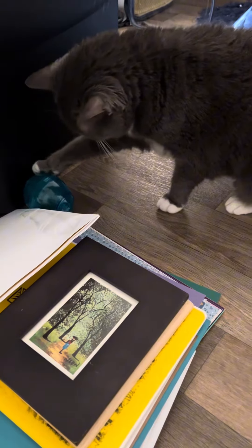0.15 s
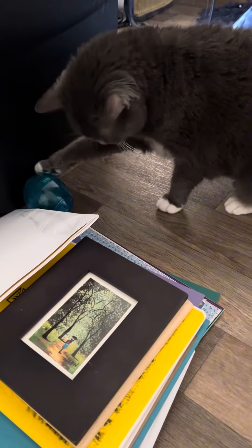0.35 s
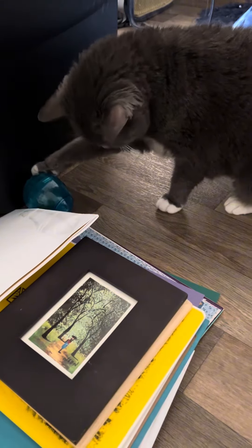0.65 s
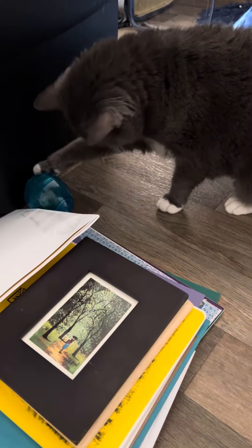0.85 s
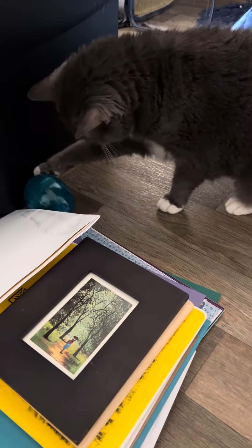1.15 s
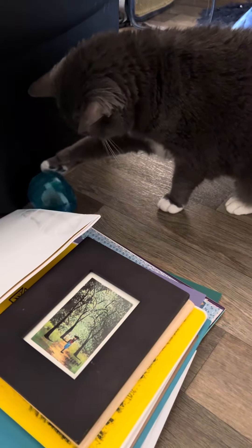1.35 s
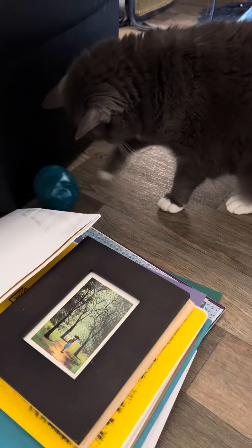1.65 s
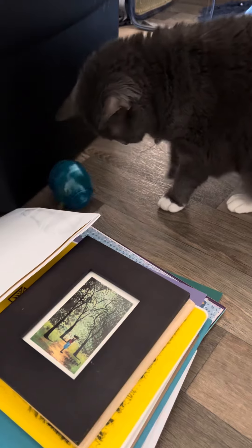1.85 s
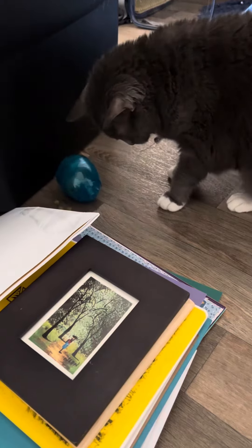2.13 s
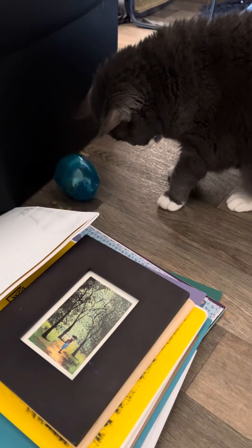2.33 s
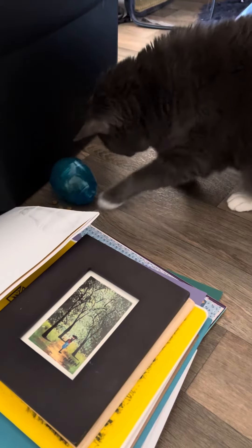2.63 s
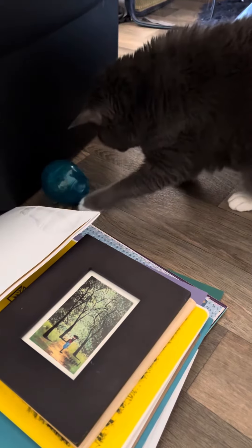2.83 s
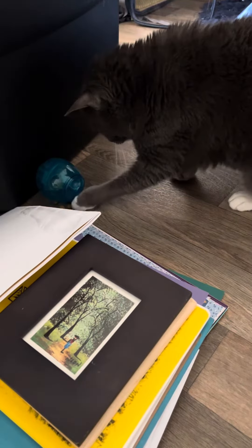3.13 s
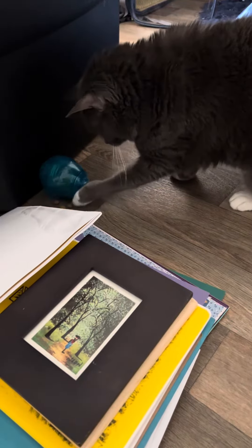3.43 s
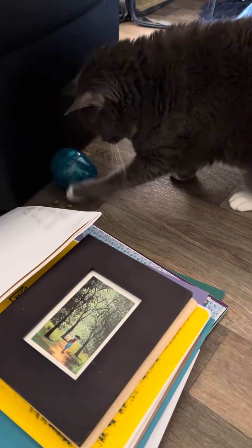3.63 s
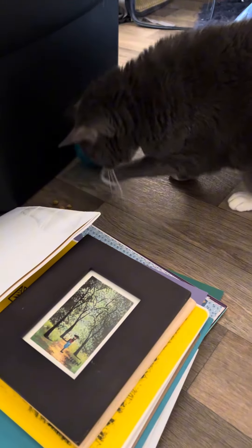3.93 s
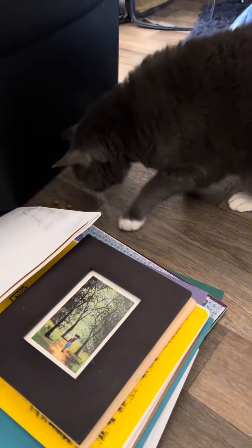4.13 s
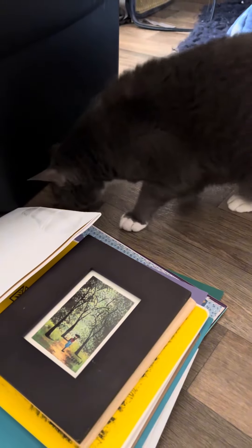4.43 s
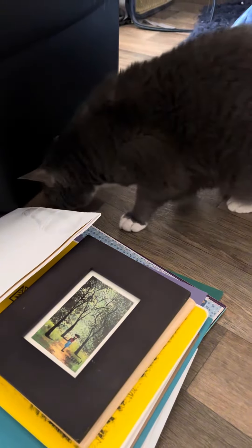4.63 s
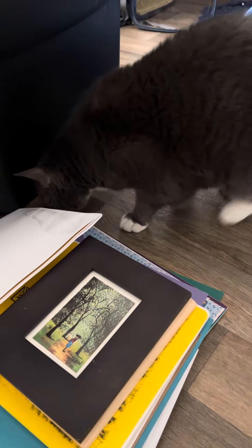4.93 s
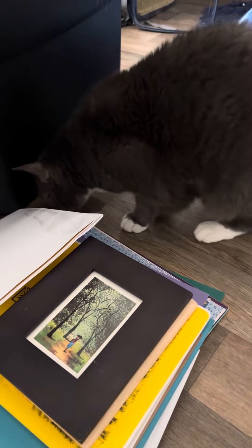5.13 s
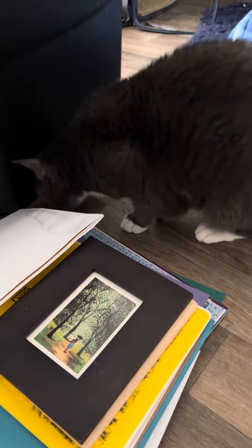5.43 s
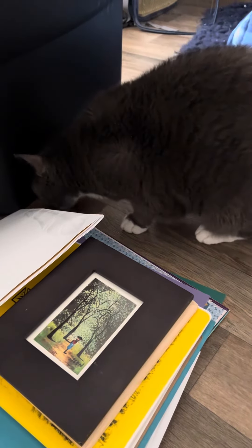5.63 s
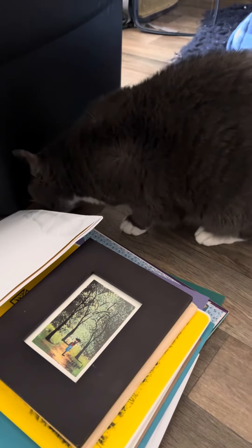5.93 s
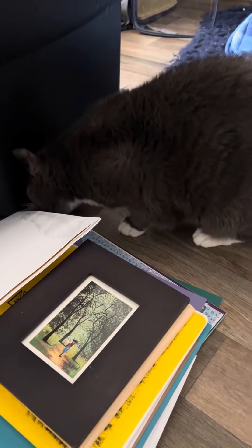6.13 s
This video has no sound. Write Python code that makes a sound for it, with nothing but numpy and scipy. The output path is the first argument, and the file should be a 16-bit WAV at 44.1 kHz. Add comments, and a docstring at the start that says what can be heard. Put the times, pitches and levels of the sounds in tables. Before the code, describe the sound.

A cat bats a hollow plastic treat ball on a hard floor indoors, close to the microphone. Two separate hits make the shell clack and the treats inside rattle. After a soft swish, the ball drops with dull thuds and rolls in a busy run of clacks. Then only faint ticks and bumps remain. Appliances hum low throughout, at first with a light hiss.

```python
"""A cat bats a hollow plastic treat ball over a hard floor, close to a two-port microphone.
Appliances hum throughout, at first under a broad hiss. At 1 s and 1.5 s the ball is struck: its shell
clacks and rings briefly, loose treats rattle, and a drop thuds through the floor boards. Near 2.7 s comes
a soft swish as the hiss fades. From 3 s the ball drops, clacks and rolls in a busy run.
After about 4.5 s only faint ticks, bumps and brief wisps of very high hiss are left over the hum."""
import sys
import numpy as np
from scipy import signal
from scipy.fft import rfft, irfft, next_fast_len
from scipy.io import wavfile
from scipy.ndimage import uniform_filter1d, map_coordinates

SR = 44100
rng = np.random.default_rng(int(sys.argv[2]) if len(sys.argv) > 2 else 0)


def unload_audio(sound):
    """Save the sound as a 16-bit wav file, at the path given as the first command line argument."""
    columns = np.transpose(np.atleast_2d(sound))
    # keep every value between -1 and 1, then stretch to whole-number steps
    steps = np.round(np.clip(columns, -1, 1) * 32767)
    wavfile.write(sys.argv[1], SR, steps.astype(np.int16))


N = 276782
TOP_HZ = 16000

# the notes the plastic shell rings at: f/Hz, level/dB, t60/s (time to fade by 60 dB)
SHELL = [(1450, -3, .018), (1780, -5, .014), (2120, -1, .018), (2440, 0, .018), (3250, -3, .011),
         (3850, -3, .011), (4860, -1, .011), (5250, -2, .009)]


def amp(db):
    """Turns decibels into a gain."""
    return 10 ** (np.asarray(db) / 20)


def unit(x):
    """Scales x to an average (rms) size of 1."""
    return x / np.sqrt(np.mean(x ** 2) + 1e-20)


def along(points, hz, axis=1):
    """Reads a table column between its rows, on a log frequency scale."""
    table = np.transpose(points)
    return np.interp(np.log(hz + 1), np.log(table[0] + 1), table[axis])


def curves(rows):
    """One value per sample for each column after the time."""
    s, *cols = np.transpose(rows)
    return [np.interp(np.arange(N) / SR, s, c) for c in cols]


def wobble(rate):
    """A smooth curve through `rate` random points a second."""
    return map_coordinates(rng.standard_normal(int(N * rate / SR) + 4), [np.arange(N) * rate / SR])


def filtered(x, response):
    """Scales and delays each frequency of x as response says."""
    m = next_fast_len(N + SR // 2)
    return irfft(rfft(x, m) * response(np.fft.rfftfreq(m, 1 / SR)), m)[..., :N]


def coloured(x, spectrum):
    """Shapes x by a table of f/Hz, level/dB, at rms 1."""
    return unit(filtered(x, lambda hz: amp(along(spectrum, hz))))


def tilted(x, tilt_db):
    """Raises or lowers the treble above 6 kHz."""
    low = filtered(x, lambda hz: 1 / (1 + (hz / 6000) ** 4))
    return low + amp(tilt_db) * (x - low)


def patchy_noise(depth_db):
    """Two noises with louder and softer patches in time and pitch."""
    z = signal.stft(rng.standard_normal((2, N)), nperseg=512)[2]
    patches = uniform_filter1d(uniform_filter1d(rng.standard_normal(z.shape[1:]), 4, 0), 14, 1)
    return signal.istft(z * amp(depth_db * unit(patches)), nperseg=512)[1][:, :N]


def ring(notes, t, attack_s):
    """Fading notes, peak 1; each blow lands elsewhere, so strengths and pitches shift a little."""
    x = sum(amp(db + rng.normal(0, 3) - 60 * t / t60) * np.sin(2 * np.pi * hz * rng.normal(1, .025) * t)
            for hz, db, t60 in notes)
    x = x * (1 - np.exp(-t / attack_s)) ** 2
    return x / np.abs(x).max()


def hum():
    """Appliances make a low, throbbing rumble."""
    # loudness over time: t/s, level/dB
    levels = [(0.0, -56.5), (0.38, -59.5), (0.99, -53.5), (1.35, -57), (1.71, -54), (2.25, -62.5),
              (2.57, -56), (2.95, -61.5), (3.62, -58.5), (3.76, -67), (3.91, -52), (5.02, -62),
              (5.44, -59.5), (6.28, -63)]
    # tone colour: f/Hz, level/dB
    rumble = [(25, -34.5), (40, -16), (57, 1), (80, -8), (100, -10.5), (115, 3.5), (135, -15), (200, -18.5),
              (300, -33.5), (450, -59)]
    hum_db, = curves(levels)
    return amp(hum_db + 1.8 * wobble(4)) * coloured(rng.standard_normal((2, N)), rumble)


def fan():
    """A fan whirs, with faint tones that waver together in pitch."""
    # colour of the whir: f/Hz, level/dB
    colour = [(150, -10.5), (350, -9), (680, -10), (775, -2), (840, -7.5), (920, 3), (1040, -8.5),
              (1470, -13.5), (2000, -22), (2600, -14.5), (3200, -27), (8000, -39.5), (13000, -45.5),
              (14500, -53.5)]
    # the fan's tones: f/Hz, level/dB
    notes = [(908, -72.5), (1470, -80.5), (778, -75.5), (2700, -91.5)]
    whir = amp(-68.5 + 0.84 * wobble(3.98)) * coloured(patchy_noise(depth_db=1.5), colour)
    clock = np.cumsum(1 + 0.0027 * wobble(6)) / SR
    tones = sum(amp(db + 0.72 * wobble(15)) * np.sin(2 * np.pi * hz * clock) for hz, db in notes)
    return whir + tones * [[1], [0]]


def hiss():
    """A broad hiss turns dull, then fades away."""
    # the hiss over time: t/s, level/dB, treble gain/dB
    levels = [(0, -66, 8.5), (2.2, -63, 7), (2.42, -65.5, 6), (2.53, -68, -14), (2.7, -68, -18),
              (2.82, -75, -24)]
    # tone colour: f/Hz, level/dB
    colour = [(500, 6), (1200, 14), (2000, 0.5), (3000, 8), (4300, -0.5), (5000, 2.5), (6000, 0),
              (7600, 0.5), (10500, -5), (13000, -4), (14400, -19.5), (16000, -40.5)]
    hiss_db, tilt_db = curves([*levels, (levels[-1][0] + 1.6, -120, 0)])
    gain = amp(hiss_db + 0.34 * wobble(4.6))
    return gain * tilted(coloured(patchy_noise(depth_db=1.66), colour), tilt_db)


def clacks():
    """Each contact is a short rough crack, a ring of wall and edges, and a knock of the hollow body."""
    # faint ticks, perhaps claws: t/s, level/dB, treble gain/dB, crack f/Hz
    ticks = [(0.0776, -56.5, 18.5, 1640), (2.873, -56.5, -26, 1650), (2.894, -59, 2, 2300),
             (2.9894, -58.5, 3, 2600), (3.167, -54, -25, 2400), (3.1735, -66, -17, 3200),
             (3.184, -63, -27, 3000), (3.278, -59, -18, 2280), (3.2918, -54, -35, 2110),
             (3.3113, -51, -14, 2960), (4.7558, -68, 2, 4800), (5.088, -59.5, -23, 1100),
             (5.627, -70, -10, 11500), (5.6572, -60, -1.5, 2310), (5.7233, -52.5, -26, 880),
             (5.888, -73, -5, 11000), (6.19, -66, -22, 1990)]
    # the ball is hit, rocks, and its treats clack: t/s, level/dB, treble gain/dB, knock gain/dB, f/Hz
    hits = [(1.0044, -26, 2, 6, 3700), (1.0067, -27, -11, -27, 2410), (1.023, -34, -8, 9, 2510),
            (1.0256, -32, -2, -17.5, 2500), (1.0304, -39, 8, 4.5, 2600), (1.037, -32, 1, -2.5, 2450),
            (1.047, -50, -3, -10, 1470), (1.052, -46, 10, -19.5, 1900), (1.514, -25, 2, 2, 2830),
            (1.517, -32, -2.5, -13, 3460), (1.5268, -40, -10, -13, 4600), (1.53, -44, -1, -18, 4600),
            (1.5378, -32, 5.5, 7, 3000), (1.5408, -32, -3.5, -25, 4340), (1.5628, -32, -4, 0, 1830),
            (1.5908, -49, 10, -18, 1920), (1.7324, -46.5, 4.5, -10, 1950), (1.7968, -44.5, -13, -7, 1920),
            (1.7975, -32, -2, -30, 5200), (3.0085, -44, -6, 9.5, 1850), (3.0815, -58, 1, 18.5, 1470),
            (3.346, -28, -7, 0.5, 2750), (3.353, -43, 4, -16.5, 2570), (3.3589, -40, 1, -12, 4400),
            (3.3672, -39, -22, 9.5, 2630), (3.373, -45, -7, -5, 3820), (3.6653, -35.5, -14, 3.5, 1980),
            (3.6997, -39, -5, 0, 1280), (3.706, -43, -3, 5.5, 1330), (3.7497, -41, -28.5, 7, 2050),
            (3.7778, -50, 1.5, -21, 4840), (3.7835, -39, -18, -25, 4860), (3.7915, -49, -12, -28, 4900),
            (3.8118, -48, -7, -28, 4360), (3.8146, -28, -27.5, -38, 4380), (3.8188, -31, -23, -36, 4460),
            (3.8431, -36, 2, -25, 5000), (3.852, -37.5, -19, -30, 4880), (3.8531, -34.5, -15, -25, 1450),
            (3.866, -43, -7, -17, 4600), (3.881, -42, -11, -26, 4600), (3.8921, -36, -19, -28, 4800),
            (3.9129, -36.5, -2, 3.5, 1990), (3.9195, -36, -4, -37, 4870), (3.9408, -48, 4, -19, 4500),
            (3.9659, -46, 6, -18, 4500), (4.0384, -34, 8.5, -10.5, 5300), (4.0425, -44, 10, -19, 4950),
            (4.084, -36.5, -5.5, -15, 1500), (4.0908, -41, -1, -4, 1300), (4.1094, -37, -11.5, -6, 1970),
            (4.1258, -30, -8, -17.5, 1500), (4.1265, -42, -7, -18, 5160), (4.1324, -32.5, -14, -14, 5030),
            (4.1345, -31.5, -10.5, -13, 2120), (4.1447, -52.5, -10, 9.5, 1500), (4.169, -47, -3, -20, 2000),
            (4.18, -50.5, 13, -2, 2030), (4.199, -39, -16, -13, 1500), (4.2035, -39.5, -4, -4, 1770),
            (4.208, -28.5, -7, -5, 1640), (4.2135, -41.5, 14, -15, 2230), (4.2463, -31.5, -2.5, -14, 2780),
            (4.2557, -52, -18.5, -2, 1790)]
    # notes of the thin edges: f/Hz, level/dB, t60/s
    rim = [(7400, 0, .012), (8200, -5, .01), (12300, -10, .005)]
    # notes of the ball's air and wall: f/Hz, level/dB, t60/s
    hollow = [(590, -2, .027), (660, -1, .016), (750, -3, .013), (870, -5, .013), (500, -11, .012)]
    hard_t60, soft_t60, tick_knock_db = .005, .016, -7.5
    hard = [(*hit, hard_t60) for hit in hits]
    soft = [(*tick[:3], tick_knock_db, tick[3], soft_t60) for tick in ticks]
    out, t = np.zeros((2, N + SR)), np.arange(SR // 30) / SR
    high = signal.butter(4, [5500, 15000], "band", fs=SR, output="sos")
    for version in out:
        for s, db, treble_db, knock_db, crack_hz, crack_s in hard + soft:
            shape = amp(-60 * t / crack_s) * (1 - np.exp(-t / crack_s * 20)) ** 2
            dull, bright = rng.standard_normal((2, len(t))) * shape / shape.max()
            band_hz = [0.5 * crack_hz, min(1.69 * crack_hz, TOP_HZ)]
            crack = signal.sosfilt(signal.butter(2, band_hz, "band", fs=SR, output="sos"), dull)
            # notes close to the crack's pitch ring most
            notes = [(hz, level - 22 * abs(np.log2(hz / crack_hz)), t60) for hz, level, t60 in SHELL]
            ring_gain = 0.7 * amp(max(level for _, level, _ in notes))
            wall = crack / np.abs(crack).max() + ring_gain * ring(notes, t, crack_s * 0.22)
            edge = 0.36 * signal.sosfilt(high, bright) + 0.43 * ring(rim, t, attack_s=0.000038)
            body = ring(hollow, np.maximum(t - .0006, 0), attack_s=0.0012)  # the soft wall answers late
            start = round(s * SR) - SR // 4000
            version[start:][:len(t)] += amp(db) * (wall + amp(treble_db) * edge + amp(knock_db) * body)
    return out[:, :N]


def rolling():
    """The shell scrapes along while treats tick against it in clumps."""
    # colour of the scrape: f/Hz, level/dB
    colour = [(300, -42), (600, 3), (1200, -2), (2200, -2.5), (4800, -10), (6000, -3), (7500, -16.5),
              (11000, -19), (13600, -17), (14600, -52), (16000, -51)]
    # each roll: fastest at t/s, swell/s, dying/s, level/dB, treble gain/dB
    rolls = [(1.033, 0.036, 0.038, -48.5, 11), (1.535, 0.037, 0.1, -50.5, 5),
             (3.359, 0.035, 0.16, -61, 5.5), (3.629, 0.065, 0.72, -70, 8.5), (3.862, 0.17, 0.16, -50, 4),
             (4.12, 0.12, 0.16, -54.5, 3.5), (4.21, 0.095, 0.17, -53, -9)]
    ticks_per_s, drop_db = 400, 23  # the drop is over one swell or dying time
    t = np.arange(N) / SR
    brief = t[:SR // 50]
    ticks = (rng.random(N) < ticks_per_s / SR) * amp(3.3 * np.clip(rng.standard_normal(N), -2, 1.2))
    bumps = .55 + unit(signal.fftconvolve(ticks, np.exp(-brief / 0.0025))[:N])
    surge = amp(1.2 * wobble(44))
    scrape = coloured(bumps * surge * rng.standard_normal((2, N)), colour)
    pings = [ring(SHELL[4:], brief, attack_s=.0002) for _ in range(2)]  # hard treats ring the top notes
    treats = signal.fftconvolve(ticks * rng.standard_normal((2, N)), pings, axes=1)[:, :N]
    rattle = scrape + amp(-10) * unit(treats)
    dull, bright = np.zeros((2, N))
    for s, swell, dying, db, tilt_db in rolls:
        speed = amp(db - drop_db * np.abs((t - s) / np.where(t < s, swell, dying)) ** 1.68)
        dull, bright = np.hypot(dull, speed), np.hypot(bright, amp(tilt_db) * speed)
    low = tilted(rattle, -120)
    return dull * low + bright * (rattle - low)


def thuds():
    """The boards bend in waves whose highs arrive first, so each thud sweeps down in pitch."""
    # the ball drops: t/s, level/dB, deep boom gain/dB
    drops = [(1.5614, -27.5, 1), (3.0087, -33, 1), (3.0791, -36.5, -0.5), (3.109, -45, 4.5),
             (3.344, -24.5, 1), (3.365, -28.5, -1), (3.41, -38.5, -2), (3.441, -40.5, 5),
             (3.664, -30, -1.5), (3.6976, -28, -6), (3.749, -37.5, -5.5), (3.9112, -31.5, -10.5),
             (4.033, -44, 4.5), (4.146, -41.5, 4), (4.255, -51.5, 3), (5.086, -61.5, -3.5),
             (5.724, -60, -4.5)]
    # notes of the boards: f/Hz, width/Hz, level/dB
    board = [(230.3, 64, 7), (352, 158, 2), (570, 45, 0.5), (1050, 83, -21)]
    # deep notes of the beams below: f/Hz, width/Hz, level/dB
    beam = [(58.3, 8.7, 1.5), (122, 19.3, 7.5), (166, 19, -5)]
    blows = np.zeros((2, N))
    for s, db, boom_db in drops:
        blows[:, round(s * SR)] = amp(db), amp(db + boom_db)
    notes = lambda table, f: sum((-1) ** k * amp(db) * 1j * f * width / (hz**2 - f**2 + 1j * f * width)
                                 for k, (hz, width, db) in enumerate(table))
    sweep = lambda f: np.exp(-2j * np.pi * 0.094 * (2 * np.sqrt(f) - f / np.sqrt(2200)))
    soft = lambda f: 1 / (1 + 1j * f / 900) ** 3  # a slow contact holds little treble
    floor = lambda f: soft(f) * sweep(np.minimum(f, 2200)) * [notes(board, f), notes(beam, f)]
    thud = filtered(np.arange(N) == 0, floor)
    thud = thud[:, :SR // 2] / np.abs(thud).max(1, keepdims=True)
    return signal.fftconvolve(blows, thud, axes=1)[:, :N].sum(0)


def swish():
    """Narrow noise swells into a soft swish, and later into faint, brief wisps of very high hiss."""
    # each swell: t/s, spread/s, level/dB, f/Hz, width/Hz
    swells = [(2.68, 0.064, -71.5, 4700, 900), (2.68, 0.076, -71, 354, 118), (5.655, .018, -92, 12600, 900),
              (5.81, .02, -86, 13100, 900), (5.895, .012, -86, 12800, 1100),
              (6.175, 0.0089, -89, 12000, 905)]
    bell = lambda x, centre, width: np.exp(-.5 * ((x - centre) / width) ** 2)
    out, t = np.zeros((2, N)), np.arange(N) / SR
    for s, spread, db, centre_hz, width_hz in swells:
        band = unit(filtered(rng.standard_normal((2, N)), lambda hz: bell(hz, centre_hz, width_hz)))
        out += amp(db) * bell(t, s, spread) * band
    return out


def room(x):
    """The room echoes, each frequency dying at its own speed."""
    # length of the echo: f/Hz, t60/s
    fade_times = [(100, 0.38), (600, 0.41), (3000, 0.42), (12000, 0.16)]
    hz, t, z = signal.stft(rng.standard_normal((2, SR // 2)), SR, nperseg=256)
    tail = signal.istft(z * amp(-60 * t / along(fade_times, hz)[:, None]), SR, nperseg=256)[1]
    return signal.fftconvolve(np.pad(x, (250, 0))[None], tail / np.linalg.norm(tail[0]), axes=1)[:, :N]


def ports(pair, table, blur):
    """Blends two versions of a sound into left and right; blur makes bands of treble less alike."""
    half_turn_hz = 2170  # above the last row, a plain delay: half a turn of phase per this step
    lag = lambda hz: np.pi * np.maximum(hz - table[-1][0], 0) / half_turn_hz
    turn = lambda hz: np.arccos(np.clip(along(table, hz, axis=3) - blur * np.sin(lag(hz)) ** 2, 0, 1)) / 2
    same, other = filtered(pair, lambda hz: [np.cos(turn(hz)), np.sin(turn(hz))])
    half = lambda hz: amp(along(table, hz, axis=2) / 2) * np.exp(.5j * (along(table, hz) - lag(hz)))
    return filtered([same + other, same - other], lambda hz: [1 / half(hz), half(hz)])


def scene():
    """The ball is near; the boards set the room booming more than the light shell does."""
    # right port against left, near sounds: f/Hz, phase/rad, level/dB, likeness (0-1)
    near = [(60, .1, 0, 1), (120, .15, 0, 1), (200, .25, 0, .99), (350, 1.1, 4, .94), (620, .7, 8, .93),
            (900, 1, 4, .8), (1300, .3, 8, .6), (2400, -2, 1, .9), (3200, -2.1, 4, .8), (3800, -1.5, 0, .8),
            (4800, -1.6, 5, .75), (5900, -3.14, 0, .975)]
    # the same for far sounds
    far = [(130, 0, 0, .995), (500, 0, -2, .1), (1200, 1.5, -4, .45), (1900, 0, -2, .6),
           (2500, -3.1, -1, .2), (3000, -3.7, 0, .55), (4500, -6, 1, .15), (5900, -9.42, 0, .99)]
    shell, boards = clacks() + rolling() + swish(), thuds()
    echo = amp(-14) * room(shell[0]) + amp(-11) * room(boards)
    ball = ports(shell + boards * [[1], [.5]] + echo, near, blur=0.052)
    return ball + ports(hum() + fan() + hiss(), far, blur=0.13)


def record(dry):
    """The highest treble is softened, with nothing above 16 kHz."""
    # treble roll-off: f/Hz, level/dB
    roll_off = [(13000, -0.5), (14500, -12.5), (16000, -12.5)]
    return filtered(dry, lambda hz: amp(along(roll_off, hz)) * (hz < TOP_HZ))


dry = scene()
out = record(dry)
unload_audio(out)
```